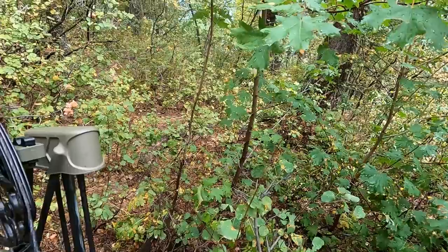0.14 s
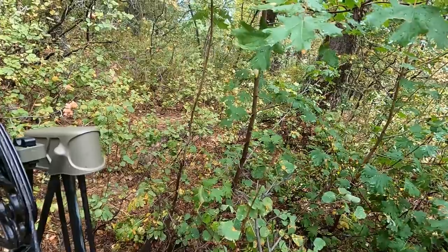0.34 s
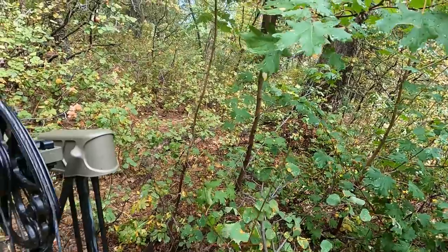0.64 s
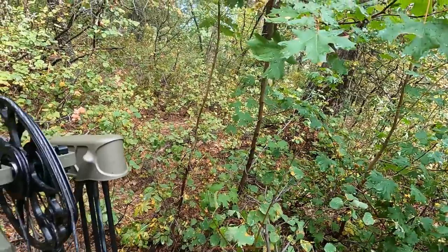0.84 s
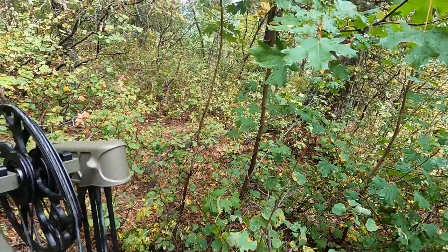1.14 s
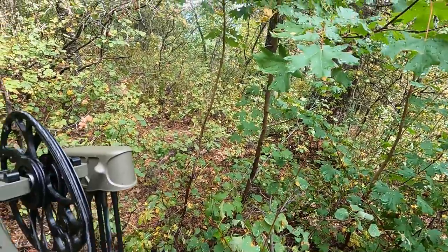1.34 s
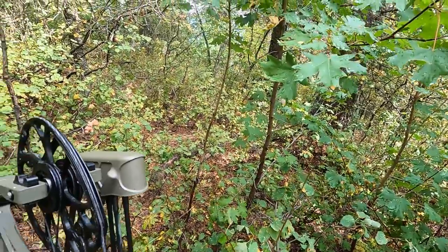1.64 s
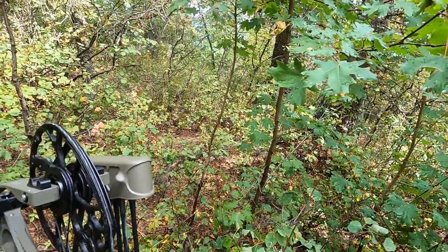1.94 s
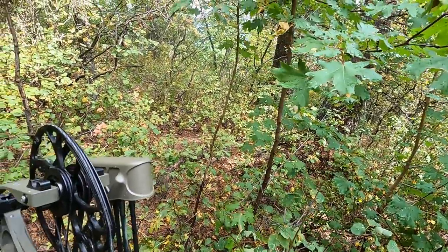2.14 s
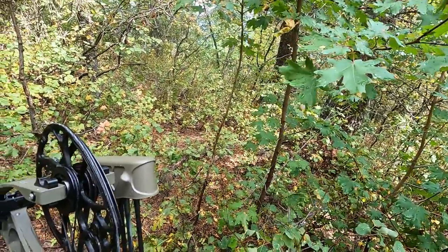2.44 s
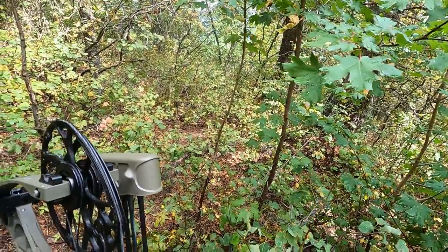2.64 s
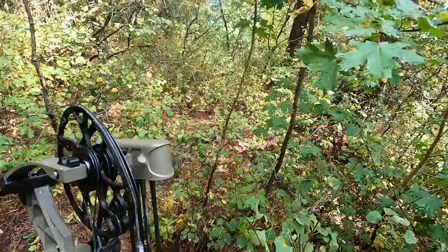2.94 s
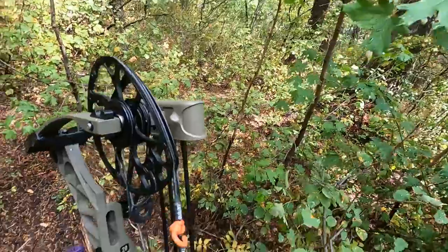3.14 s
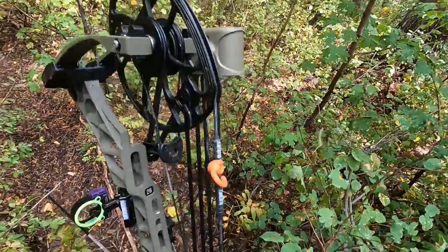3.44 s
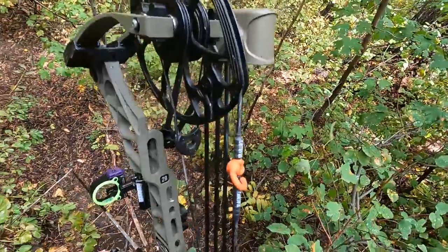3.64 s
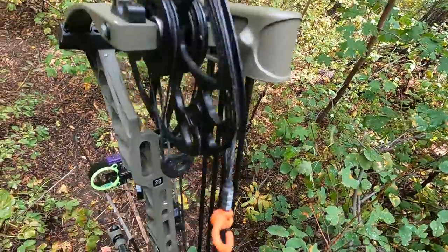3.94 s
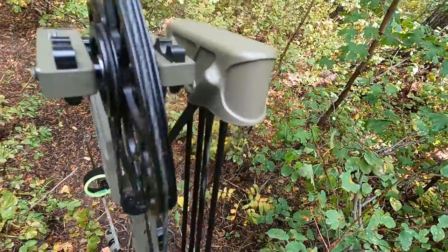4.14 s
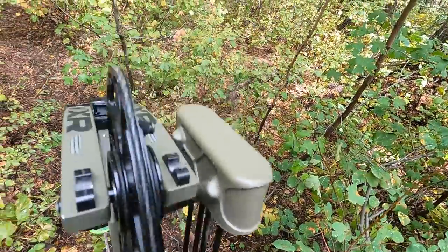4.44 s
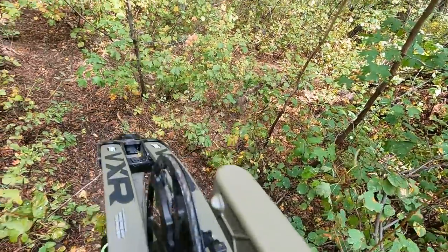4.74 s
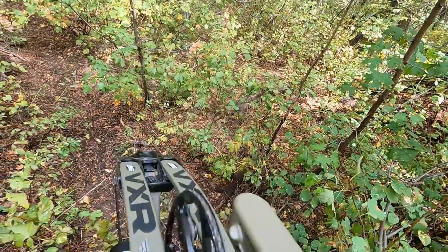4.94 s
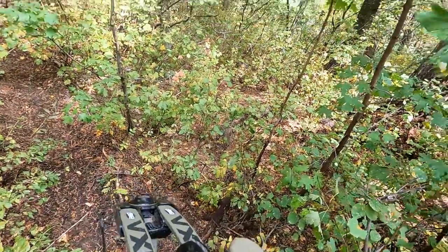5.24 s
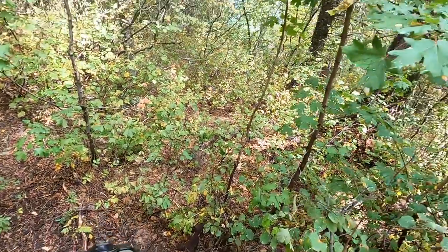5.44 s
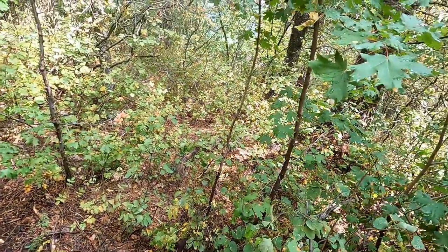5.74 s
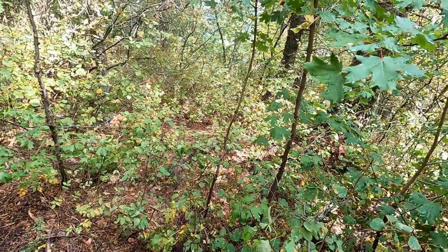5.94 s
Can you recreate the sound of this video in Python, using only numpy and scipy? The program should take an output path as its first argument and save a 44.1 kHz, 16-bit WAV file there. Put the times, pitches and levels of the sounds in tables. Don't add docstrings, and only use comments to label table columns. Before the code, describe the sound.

A large animal's hoarse, throbbing grunt is already under way at 0 seconds and dies by about 0.15, its rapid nasal pulses echoing among trunks, with a few dry ticks and a thin airy whistle. From 0.34 a sleeve scrapes across the small stereo microphone, growing faster and brighter, with heavy low knocks at 0.5 and 0.6, then stops abruptly. Quiet woods remain: lumpy low wind hum, soft leaf hiss, very faint insects and distant moans between 0.9 and 2.6. A cluster of dull taps and buckle clicks comes near 2.55. The second grunt, snappy and breathy, runs from 3.3 to 3.5; a faint whistle follows. After small clicks around 4.4, the third grunt throbs from 4.5 to 4.7, amid twig ticks. From 5 to 6 seconds, leaves and cloth rustle close by in little strokes, with tiny squeaks and wind puffs.

```python
import sys
import numpy as np
from scipy import signal
from scipy.fft import rfft, irfft
from scipy.io import wavfile
from scipy.ndimage import uniform_filter1d

SR = 44100
rng = np.random.default_rng(int(sys.argv[2]) if len(sys.argv) > 2 else 0)


def materialize(psi):
    bounded = np.clip(np.atleast_2d(psi).T, -1, 1)
    quanta = np.round(bounded * 32767).astype(np.int16)
    wavfile.write(sys.argv[1], SR, quanta)


def gain_from_decibels(decibels):
    exponent = np.asarray(decibels, float) / 20
    return 10 ** exponent


N = 269010
T = np.arange(N) / SR

# time_s, folds_db
THROBS = [
    [(-.112, -31), (-.1, -18), (-.086, -16), (-.07, -10), (-.054, -6), (-.036, -2), (-.014, 6), (.010, 1),
     (.035, -0.5), (.058, 0), (.084, 1), (.103, -6), (.122, -7.5), (.14, -14), (.163, -20)],
    [(3.287, -23.5), (3.2975, -17), (3.313, -13), (3.3295, -7.5), (3.344, -4), (3.36, -1.5), (3.381, 0),
     (3.403, -1), (3.425, 0), (3.447, -3), (3.47, -10), (3.488, -13), (3.504, -13), (3.52, -25),
     (3.537, -25)],
    [(4.469, -21.5), (4.481, -24), (4.495, -12.5), (4.509, -11), (4.523, -4), (4.539, -1), (4.556, 1.5),
     (4.579, 0), (4.599, 0), (4.623, -4), (4.644, -6), (4.662, -4.5), (4.68, -12), (4.695, -17),
     (4.712, -22)],
]
# level_db, second_partial_top_hz, tiring_db_per_throb, snap_db, airflow_db
VOICES = [
    (-23, 1235, 0, 2, -2.5),
    (-22, 1200, -0.5, 4.5, 2),
    (-21, 1275, 3, 0.5, -0.5),
]
# throb_number, pitch_arch_0_to_1, slack_db, breath_db
CALL_SHAPE = [(-.5, 0, -92, -83), (1.1, 0.03, -76, -66), (2.1, 0.17, -51.5, -58.5), (5.1, 0.84, -46, -50.5),
              (6.1, 1, -42, -48), (8.1, 0.96, -41.5, -44), (11.1, .25, -39, -43.5),
              (12.1, 0.12, -44.5, -44), (14.1, 0.08, -55, -57)]
# multiple, level_db
TIGHT_PARTIALS = [(1, -21.5), (2, -1), (3, -17), (4, -30.5)]
# multiple, level_db
SLACK_PARTIALS = [(1, -16), (2, -9), (3, 3.5), (4, -11), (5, -17)]
# frequency_hz, density_db_per_hz
BREATH_COLOUR = [(1180, -21), (2000, -2), (2300, -12), (2650, 0), (3180, -5.5), (3550, 1.5), (4500, 1),
                 (5300, -7), (6290, -16.5), (9000, -41.5), (11700, -74), (19800, -120)]
# frequency_hz, width_hz, level_db
THROAT = [(474, 133, -9), (1080, 33, 3.5), (1400, 250, 4.5), (1600, 460, -5), (2000, 60, -19)]
# frequency_hz, width_hz, level_db
SNAP_MODES = [(1080, 100, -3), (1290, 110, 1), (1600, 140, -5)]
# frequency_hz, width_hz, level_db
SNAP_BRIGHT = [(2476, 400, -26), (3700, 800, -24)]
# frequency_hz, left_over_right_db
CALL_PAN = [(60, -6.5), (150, 13), (380, -3), (950, 16), (2380, 2.5), (5970, 3.5), (15000, -4)]
# frequency_hz, lead_rad
CALL_LEAD = [(300, 1.02), (1200, 0.5), (2200, 1.7), (4000, 1.05)]
# frequency_hz, t60_s
WOODS_DECAY = [(500, 0.16), (1000, 0.82), (1230, 1.55), (1500, 1.12), (1800, 1.5), (3000, 0.93),
               (6000, 0.8)]
# time_s, level_db
WIND = [(0, -47), (.33, -47.5), (.68, -52), (1.0, -52), (1.9, -50.5), (2.1, -44), (2.7, -45.5), (2.96, -48),
        (3.4, -43), (3.75, -49), (4.3, -48.5), (4.55, -47.5), (5.3, -47), (5.56, -47.5), (6.07, -50)]
# peak_s, over_steady_wind_db
GUSTS = [(.172, 7), (.32, 2), (.8, 1.5), (1.37, 4), (1.69, 8.5), (2.049, 9), (2.299, 3), (2.45, 2),
         (2.751, 6), (3.17, 5.5), (3.58, 4), (3.811, 10.5), (3.959, 9), (5.449, 9.5), (5.61, -3),
         (5.9, 7.5)]
# time_s, level_db
BREEZE = [(0, -1), (.9, -0.5), (1.5, 12.5), (2.2, -3), (2.8, 11), (3.33, 7), (3.7, 3), (4.1, 6.5),
          (4.7, -3), (5.25, -7), (5.6, 9), (6.1, -3)]
# frequency_hz, density_db_per_hz
MURMUR_COLOUR = [(210, -3), (350, 7), (467, -14), (511, -28), (883, -4.5), (1140, 1), (1500, -3),
                 (1970, -11.5), (3000, -17.5), (3900, -42.5), (6600, -120)]
# frequency_hz, density_db_per_hz
HISS_COLOUR = [(1530, -2.5), (2600, -8.5), (4040, -7.5), (5520, -3.5), (7220, -9), (8260, -15.5),
               (11900, -24), (12700, -28), (13300, -55), (15400, -31)]
# frequency_hz, likeness
AIR_LIKENESS = [(60, 1), (180, 1), (550, 0.35), (1650, 0.56), (4970, 0.84), (15000, 0.34)]
# frequency_hz, lead_rad
PORT_LEAD = [(340, 0.51), (1000, -0.41), (2800, -1.32), (5500, -0.36)]
# frequency_hz, left_over_right_db
AIR_PAN = [(500, -4.5), (1500, -0.5), (5000, 1), (12000, 5.5)]
# frequency_hz, level_db, loudest_s, half_length_s
INSECTS = [(4800, -84, .78, .25), (5300, -85, 1.45, .3), (4800, -88, 2.0, .8)]
# time_s, peak_db, left_over_right_db
TWIGS = [(.0944, -56, -4), (.1196, -59, -1), (0.606, -45, 7), (0.84, -70, -7.5), (3.829, -58, 7),
         (4.5656, -51, 4), (4.782, -51.5, -4), (4.892, -42.5, 5.5), (5.5404, -64, 3)]
# time_s, peak_db, left_over_right_db, ring_hz
BUCKLES = [(.1446, -39, 3, 5030), (2.5396, -44, -6, 4700), (2.572, -50, -8, 4670), (4.34, -46, 2, 4380),
           (4.4337, -52.5, -3, 4800)]
# time_s, peak_db, ring_hz, width_hz, t60_s
TAPS = [(2.524, -44, 2200, 2000, 0.022), (2.541, -29, 754, 1570, 0.012), (2.55, -35.5, 493, 690, .07),
        (2.57, -38, 1080, 2400, 0.022), (2.584, -44.5, 786, 1200, 0.1), (3.529, -43.5, 710, 600, 0.017),
        (5.0933, -44.5, 1960, 700, 0.021)]
# start_s, length_s, peak_db, start_hz, glide_hz
WHISTLES = [
    (.17, .19, -70, 7770, -200),
    (3.6, .19, -75, 7730, -150),
    (4.95, .12, -75, 7500, 450),
]
# start_s, length_s, peak_db, start_hz, glide_hz
MOANS = [(0.922, 0.23, -66, 1470, 40), (1.15, 0.28, -67.5, 1510, -60), (1.9, 0.11, -62.5, 1230, 0),
         (2.203, 0.38, -66, 1550, -50)]
# start_s, length_s, peak_db, start_hz, glide_hz
SQUEAKS = [(5.1, .05, -64, 2250, 200), (5.2, .045, -61, 2450, 80), (5.2, .04, -65, 4450, 100),
           (5.325, .1, -66, 2550, 50), (5.11, .07, -72, 9300, 100), (5.13, .06, -68, 5600, 200),
           (5.485, .13, -70, 5750, -200), (5.655, .07, -70, 5900, 200)]
# time_s, peak_db, ring_hz, t60_s, left_over_right_db
PUSHES = [(.225, -35, 50, .08, -3), (.479, -15, 75, .04, -6), (.491, -11, 70, .04, -3),
          (.4975, -15, 450, .012, -2), (.5068, -13, 55, .05, -3), (.5115, -13, 90, .02, -3),
          (.524, -21, 45, .06, -3), (.574, -17, 35, .06, 0), (.5918, -6, 200, .024, -2),
          (.5982, 3.5, 45, .045, -22)]
# time_s, peak_db, ring_hz, t60_s, left_over_right_db
PULLS = [(.362, -30, 45, .1, -3), (.4988, -5, 105, .02, -2.5), (.5035, -8, 140, .018, -5),
         (.5908, -11, 600, .006, -2), (.6045, -2.3, 31, .1, .5)]
# peak_s, half_length_s, brush_db, hollow_ring_db
RUSTLES = [(0.282, 0.024, -57.5, -64), (2.546, 0.062, -59.5, -63), (5.022, 0.53, -68, -77),
           (5.146, 0.05, -61.5, -51), (5.206, 0.059, -59, -49.5), (5.377, 0.07, -66.5, -69),
           (5.562, 0.055, -62.5, -65), (5.698, 0.055, -63, -81), (5.84, 0.3, -71.5, -87)]
# frequency_hz, density_db_per_hz
BRUSH_COLOUR = [(880, -40), (1500, -3.5), (2520, -9), (3150, -10), (3370, -16), (4010, -11), (5610, -8.5),
                (9450, -17.5), (12600, -23.5), (15000, -58)]
# time_s, sliding_speed_db, pressure_db
SLEEVE = [(.34, -68, -63), (.365, -59, -46.5), (.4, -50.5, -45), (.447, -43.5, -64), (.497, -42.5, -36),
          (.52, -43, -60), (.555, -40, -62), (.588, -43.5, -43), (.596, -57, -43)]
# frequency_hz, density_db_per_hz
SCRAPE_COLOUR = [(1800, -4), (2500, -3), (3500, 0), (4200, -1), (5200, -5), (6200, -6), (7500, -7),
                 (10000, -32)]
# frequency_hz, density_db_per_hz
EDGE_COLOUR = [(3240, -38), (6620, -30), (7000, 11), (7300, 18), (7700, 11.5), (8800, 7), (10400, -2),
               (12000, 0), (13400, -7), (15400, -24)]
# frequency_hz, density_db_per_hz
RUB_COLOUR = [(350, -20), (560, -9), (720, -16), (950, -5), (1450, 0), (1800, -8), (2400, -25), (4000, -60)]
# frequency_hz, left_over_right_db
SLEEVE_PAN = [(400, -14), (1400, -1.5), (4200, 0), (7000, 4)]

THROB_COUNT, SLOWEST_THROB = 14, 8
FIRST_GAP_S = .0118
REST_HZ, SLACK_OVER_TOP = 1048, 1.27
BREATH_TIRES, SLACK_FLOWS = 0.53, 0.56


def evened(x):
    return x / np.sqrt(np.mean(x ** 2) + 1e-20)


def read(points, hz):
    f, value = np.transpose(points)
    return np.interp(np.log(hz + 1), np.log(f + 1), value)


def curves(rows):
    s, *columns = np.transpose(rows)
    gate = uniform_filter1d(1. * ((T >= s[0]) & (T < s[-1])), size=150, mode="nearest")
    return [gate] + [np.interp(T, s, c) for c in columns]


def resonate(x, hz, width):
    turn = np.exp(2j * np.pi * np.cumsum(hz * np.ones(x.shape[-1])) / SR)
    r = np.exp(-np.pi * width / SR)
    return 2 * (turn * signal.lfilter([1 - r], [1, -r], x / turn + 1e-18)).real


def resonate_twice(x, hz, width):
    return resonate(resonate(x, hz, width), hz, width)


def band(x, order, hz, kind):
    return signal.sosfilt(signal.butter(order, hz, kind, fs=SR, output="sos"), x)


def drift(rate_hz):
    return evened(band(rng.standard_normal(N), 2, rate_hz, "low"))


def noise(spectrum, pan, same, patchy_db):
    frames, hz = N // 128 + 5, np.fft.rfftfreq(512, 1 / SR)
    a, b, c, d, patches = rng.standard_normal((frames, 257, 5)).T
    patches = uniform_filter1d(patches, size=8, axis=0)
    patches = evened(uniform_filter1d(patches, size=16, axis=1))
    same = np.clip(read(same, hz), -1, 1)[:, None]
    left = a + 1j * b
    right = same * left + np.sqrt(1 - same ** 2) * (c + 1j * d)
    right = right * np.exp(-1j * read(PORT_LEAD, hz))[:, None]
    half_db = read(pan, hz)[:, None] / 2
    z = np.array([left * gain_from_decibels(half_db), right * gain_from_decibels(-half_db)])
    z = z * gain_from_decibels(read(spectrum, hz)[:, None] + patchy_db * patches)
    out = signal.istft(z, nperseg=512, noverlap=384)[1][:, :N]
    return out / out.mean(0).std()


def call(throbs, level_db, top_hz, tire_db, bite_db, flow_db):
    number = np.arange(THROB_COUNT)
    s, fold_db = np.transpose(throbs)
    s = np.r_[s[0] - FIRST_GAP_S, s]
    turn = np.interp(T, s, np.arange(len(s)))
    phase = turn % 1
    row = np.clip(turn.astype(int) - 1, 0, THROB_COUNT - 1)
    gate = uniform_filter1d(1. * ((turn > .5) & (T < s[-1])), size=300, mode="nearest")
    peak_db = level_db + fold_db[:-1]
    fold_gain = gain_from_decibels(peak_db[row])

    at, arch, slack_db, breath_db = np.transpose(CALL_SHAPE)
    slack_db = np.interp(turn - 1, at, slack_db)
    breath_db = np.interp(turn - 1, at, breath_db)
    arch = np.interp(turn - 1.4, at, arch)
    spent_db = BREATH_TIRES * tire_db * np.maximum(turn - 3 - SLOWEST_THROB, 0)

    skew = np.interp(row, [2, 6.5], [.3, .9])
    tight = np.sin(np.pi * np.clip(phase / .9, 0, 1) ** skew) ** 1.3 * (turn >= 1)
    pitch = (REST_HZ + (top_hz - REST_HZ) * arch) / 2 * (1 + 0.0051 * drift(106) + .05 * (.4 - phase))
    high = 2 * np.pi * np.cumsum(pitch) / SR
    clear = fold_gain * tight * sum(gain_from_decibels(db) * np.cos(k * high) for k, db in TIGHT_PARTIALS)

    slack_hz = SLACK_OVER_TOP * top_hz - 95 * np.maximum(turn - 11, 0)
    low = 2 * np.pi * np.cumsum(slack_hz * (1 + .02 * drift(70))) / SR / 3
    slack_gain = gain_from_decibels(slack_db + 6.5 + SLACK_FLOWS * flow_db + spent_db) * (1.1 - tight)
    slack = slack_gain * sum(gain_from_decibels(db) * np.cos(k * low) for k, db in SLACK_PARTIALS)

    late = np.maximum(number - SLOWEST_THROB, 0)
    rough = 0.07 + (0.25 - 0.07) * np.minimum(late / 2, 1) ** 2
    puff = rng.standard_normal(N)
    rasp = evened(sum(gain_from_decibels(db) * resonate_twice(puff, f, w) for f, w, db in THROAT))
    rasp *= uniform_filter1d(fold_gain * np.clip(rough[row], 0, 1), size=200)

    snap_db = np.interp(number, [2, 6, THROB_COUNT - 1], [0, -16, -20])
    snaps, opens = np.zeros(N), s[1:-1]
    heard = opens >= 0
    snaps[(opens[heard] * SR).astype(int)] = gain_from_decibels(peak_db + snap_db + bite_db)[heard]
    rings = sum(gain_from_decibels(db) * resonate(snaps, f, w) * SR / (2 * np.pi * w) for f, w, db in SNAP_MODES)
    rings = band(rings, 5, [900, 1850], "band")
    rings = rings + sum(gain_from_decibels(db) * resonate_twice(snaps, f, w) * SR / (2 * np.pi * w)
                        for f, w, db in SNAP_BRIGHT)

    breath = noise(BREATH_COLOUR, [(1, 0)], [(1, 1)], patchy_db=.7)[0]
    breath = gain_from_decibels(breath_db + flow_db + spent_db) * (.65 + .5 * tight) * breath
    return gate * (clear + slack + rasp + breath) + rings


def ports(x):
    hz = np.fft.rfftfreq(N, 1 / SR)
    half = gain_from_decibels(read(CALL_PAN, hz) / 2) * np.exp(.5j * read(CALL_LEAD, hz))
    return irfft(rfft(x) * np.array([half, 1 / half]) / abs(half + 1 / half) * 2, N)


def woods(x):
    taps = np.zeros((2, 2, 2 * SR))
    at = np.arange(400, 2 * SR - 20, 20)
    at = at + rng.integers(0, 20, (2, 2, len(at)))
    np.put_along_axis(taps, at, rng.choice([-1., 1.], at.shape), 2)
    hz, t, z = signal.stft(taps, SR, nperseg=256)
    tail = signal.istft(z * gain_from_decibels(-60 * t / read(WOODS_DECAY, hz)[:, None]), SR, nperseg=256)[1]
    sway_rad = .6 * drift(25)
    paths = x * np.array([[np.cos(sway_rad)], [np.sin(sway_rad)]])
    echo = signal.fftconvolve(paths, tail / np.linalg.norm(tail[0, 0]), axes=2).sum(0)[:, :N]
    return echo * gain_from_decibels(np.array([[1.5], [-1.5]]))


def wind():
    gust_s = 0.019
    db = curves(WIND)[1] + sum(gust_db * np.exp(-((T - s) / gust_s) ** 2) for s, gust_db in GUSTS)
    hz = 178.8 + 7.4 * drift(6.4)
    a, b = rng.standard_normal((2, N)) * gain_from_decibels(1.63 * drift(19.4))
    push = band(np.array([a, 0.67 * a + 0.76 * b]), 8, 122, "high")
    hum = evened(resonate(resonate(push, 0.958 * hz, 58), 0.95 * hz, 58.5))
    over = evened(resonate_twice(push, 235, 109))
    top = evened(resonate_twice(push, 410, 220))
    both = gain_from_decibels(db) * hum + gain_from_decibels(0.35 * db - 41.0) * (over + gain_from_decibels(-16.0) * top)
    return both * gain_from_decibels(np.array([[-1.2], [1.2]]))


def air():
    breeze_db = curves(BREEZE)[1]
    settle = gain_from_decibels(-58.5 - 71 * abs(T - 0.67))
    low = evened(band(noise([(1, 0)], [(1, -1.7)], [(1, 1.0)], patchy_db=7.0), 3, [18, 70], "band"))
    rumble = (gain_from_decibels(-72 + breeze_db) + settle) * low
    murmur = gain_from_decibels(-62 - 0.24 * breeze_db) * noise(MURMUR_COLOUR, AIR_PAN, AIR_LIKENESS, patchy_db=3.0)
    hiss = gain_from_decibels(-68.5 + 0.042 * breeze_db) * noise(HISS_COLOUR, AIR_PAN, AIR_LIKENESS, patchy_db=1.0)
    insects = sum(gain_from_decibels(db) * np.exp(-((T - s) / half) ** 2) * evened(resonate(rng.standard_normal(N), hz, 30))
                  for hz, db, s, half in INSECTS)
    return rumble + murmur + hiss + insects


def ticks():
    # time_s, peak_db, ring_hz, width_hz, left_over_right_db, t60_s
    rows = ([(s, db, 7200, 4200, pan_db, .009) for s, db, pan_db in TWIGS]
            + [(s, db, hz, 2500, pan_db, .0105) for s, db, pan_db, hz in BUCKLES]
            + [(s, db, hz, width, -2, t60) for s, db, hz, width, t60 in TAPS])
    out, t = np.zeros((2, N)), np.arange(1500) / SR
    for s, db, hz, width, pan_db, t60 in rows:
        burst = rng.standard_normal(1500) * gain_from_decibels(-60 * t / t60)
        snap = resonate_twice(burst, hz, width)
        at = round(s * SR)
        out[:, at:at + 1500] += gain_from_decibels(db) * snap / abs(snap).max() * gain_from_decibels(np.array([[pan_db / 2], [-pan_db / 2]]))
    return out


def whistle(start, length, db, start_hz, glide_hz):
    gate, hz, db = curves([(start, start_hz, db - 9),
                           (start + .025, start_hz, db),
                           (start + length, start_hz + glide_hz, db - 25 * length)])
    return gate * gain_from_decibels(db + 3.1 * drift(30)) * evened(resonate_twice(rng.standard_normal(N), hz, 320))


def knocks(rows):
    out = np.zeros((2, N))
    for s, db, hz, t60, pan_db in rows:
        t = np.clip(T - s, 0, 1)
        swing = (1 - np.exp(-t * hz * 70)) * np.sin(2 * np.pi * hz * t)
        out += gain_from_decibels(db - 60 * t / t60) * swing * gain_from_decibels(np.array([[pan_db], [0]]))
    return out


def rustle():
    drop_db = -14.5
    brush_gain, ring_gain = sum(gain_from_decibels(drop_db * abs(T - s) / half) * gain_from_decibels(np.array([[db], [ring_db - 11.5]]))
                                for s, half, db, ring_db in RUSTLES)
    brush = noise(BRUSH_COLOUR, [(1, -1.3)], [(1, 0.86)], patchy_db=1.1)
    ring = evened(resonate_twice(rng.standard_normal(N), 2450, 300) * gain_from_decibels(2.1 * drift(38.4)))
    return gain_from_decibels(1.28 * drift(47)) * (brush_gain * brush + ring_gain * ring)


def sleeve():
    gate, scrape_db, rub_db = curves(SLEEVE)
    since = np.clip(T - SLEEVE[0][0], 0, .25)
    grit = gain_from_decibels(1.2 * drift(150))
    scrape = gain_from_decibels(scrape_db + 3.0) * noise(SCRAPE_COLOUR, SLEEVE_PAN, [(1, 0.76)], patchy_db=-2.0)
    taut = evened(resonate_twice(rng.standard_normal((2, N)), 3000 + 5400 * since, 700))
    taut = gain_from_decibels(scrape_db - 16 + 65 * since) * taut
    edge = noise(EDGE_COLOUR, [(6000, 4.25), (8000, 13), (13000, 9)], [(1, .4)], patchy_db=1.6)
    edge = gain_from_decibels(scrape_db - 17 + 74 * since) * edge
    rub = gain_from_decibels(rub_db) * noise(RUB_COLOUR, SLEEVE_PAN, [(1, .7)], patchy_db=1.2)
    shake_db = -42.5 + 38 * since + 8 * np.exp(-((T - 0.503) / 0.018) ** 2)
    shake = gain_from_decibels(shake_db) * noise([(20, 12.5), (70, -11.0), (180, 4.5), (500, -12.5), (900, -49)],
                                  [(1, -6.5)], [(1, 0.42)], patchy_db=-2.5)
    return gate * (grit * (scrape + taut + edge + rub) + shake)


def scene():
    voice = sum(call(when, *how) for when, how in zip(THROBS, VOICES))
    voice = voice * np.minimum(T / .0006, 1)
    animal = gain_from_decibels(-1.0) * ports(voice) + gain_from_decibels(-13.0) * woods(voice)
    lines = sum(whistle(*row) for row in WHISTLES + SQUEAKS + MOANS)
    camera = sleeve() + knocks(PUSHES) - knocks(PULLS)
    return animal + lines + wind() + air() + ticks() + rustle() + camera


def roll_off(x):
    return signal.sosfilt(signal.butter(12, 15590, fs=SR, output="sos"), x)


def record(dry):
    mix = band(dry, 1, 12, "high")
    mix = band(mix, 6, 14200, "low")
    return roll_off(mix)


dry = scene()
out = record(dry)
materialize(out)
```